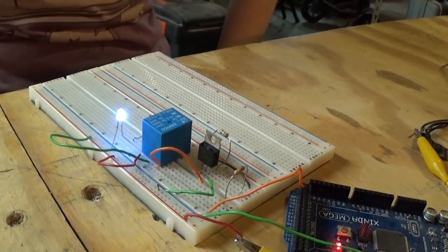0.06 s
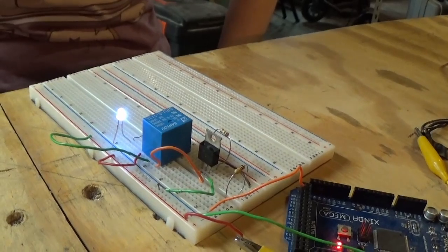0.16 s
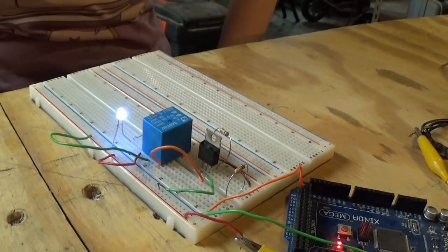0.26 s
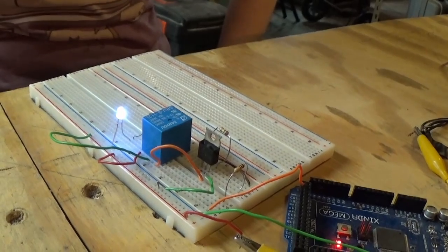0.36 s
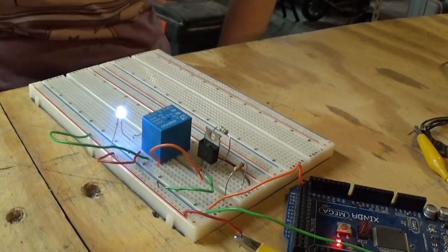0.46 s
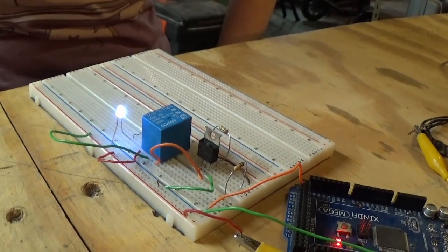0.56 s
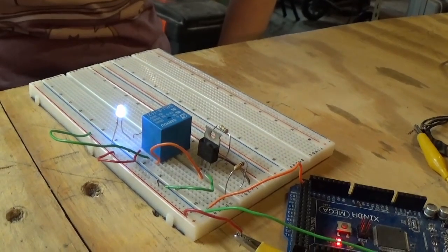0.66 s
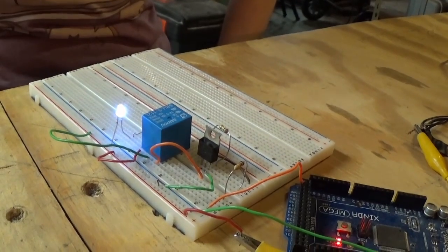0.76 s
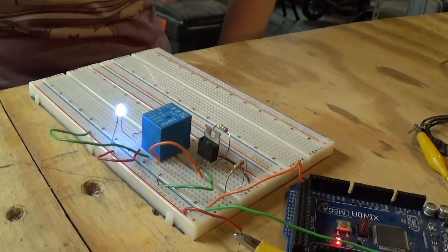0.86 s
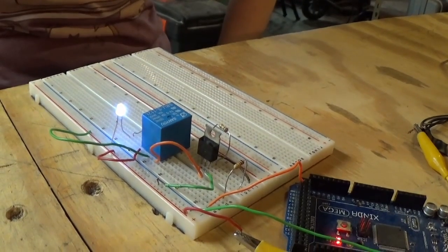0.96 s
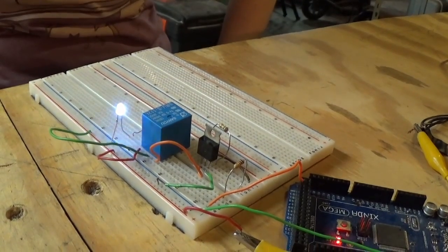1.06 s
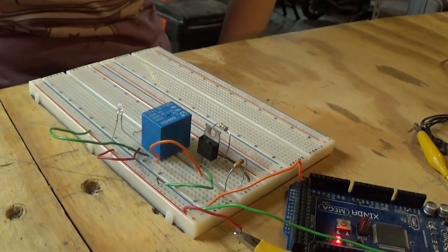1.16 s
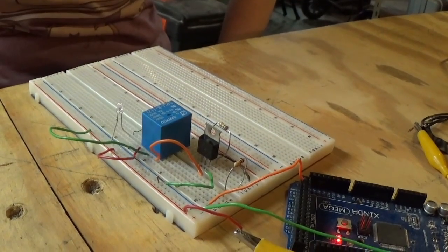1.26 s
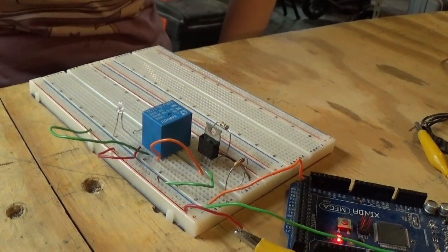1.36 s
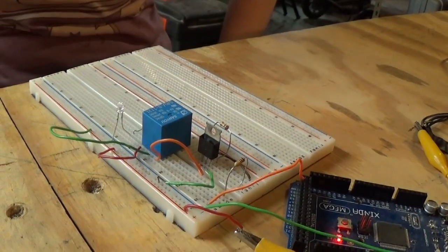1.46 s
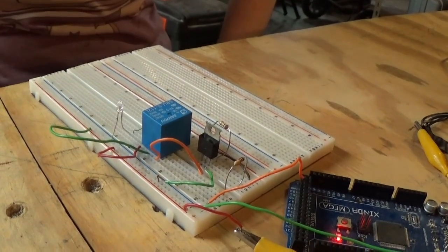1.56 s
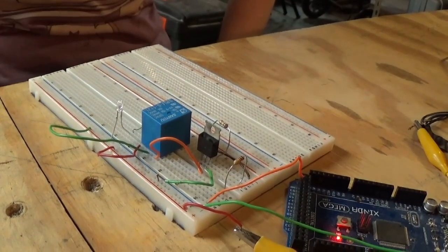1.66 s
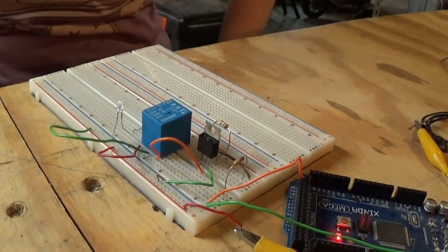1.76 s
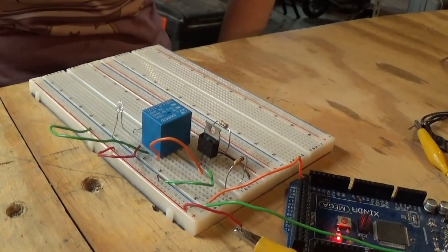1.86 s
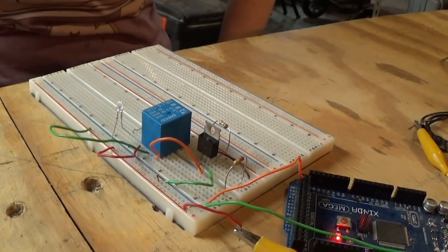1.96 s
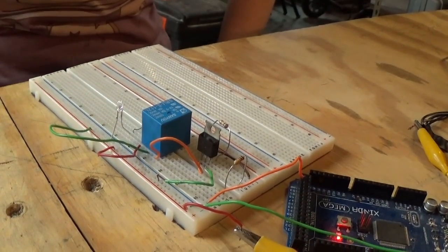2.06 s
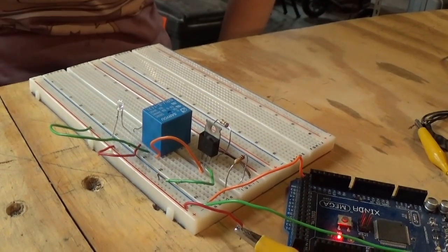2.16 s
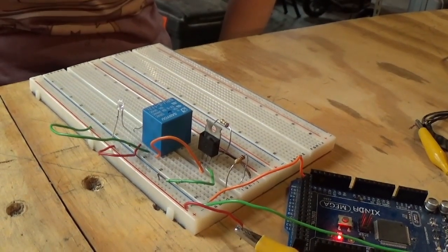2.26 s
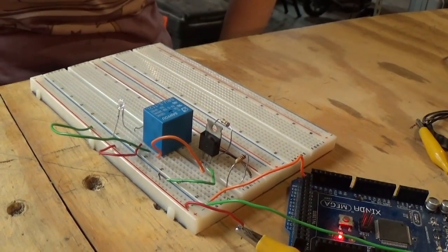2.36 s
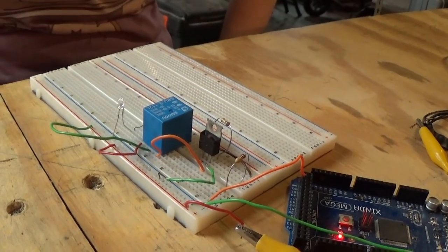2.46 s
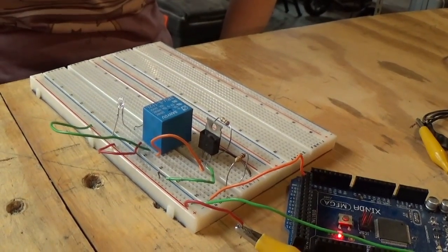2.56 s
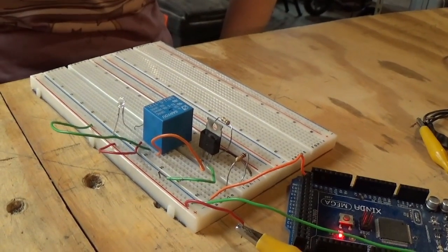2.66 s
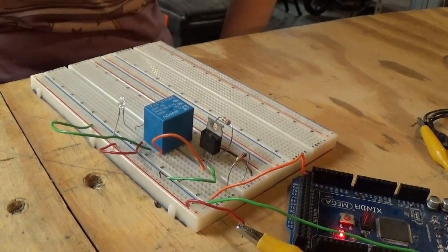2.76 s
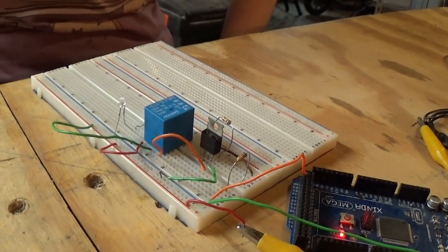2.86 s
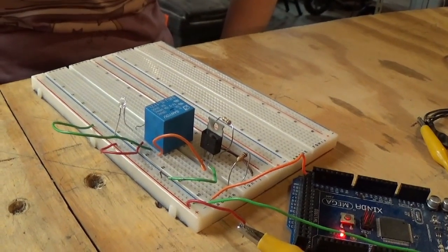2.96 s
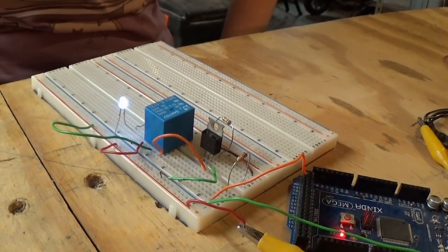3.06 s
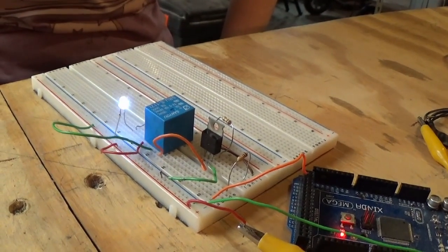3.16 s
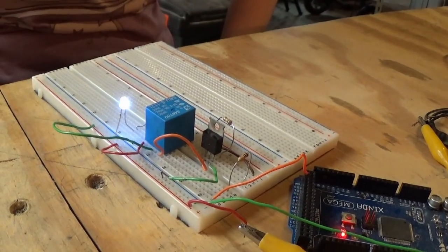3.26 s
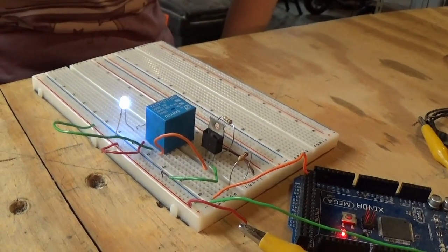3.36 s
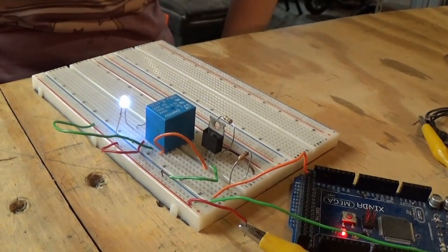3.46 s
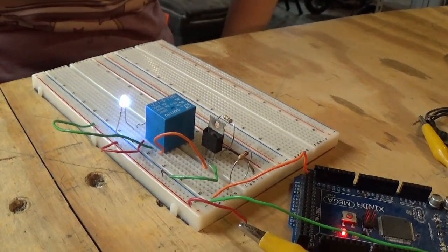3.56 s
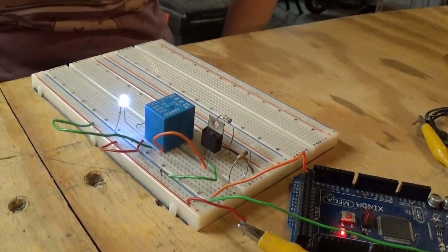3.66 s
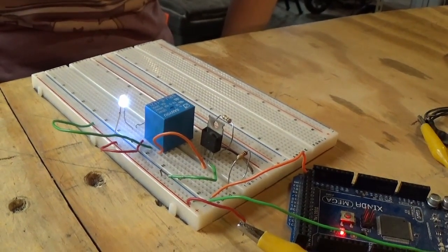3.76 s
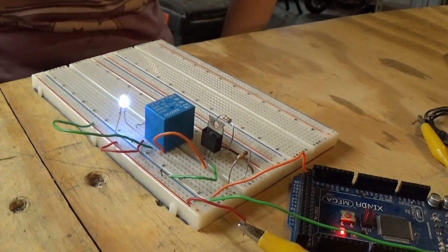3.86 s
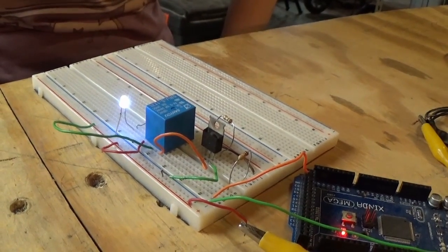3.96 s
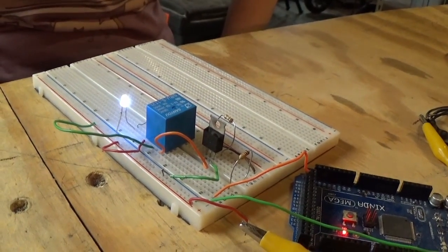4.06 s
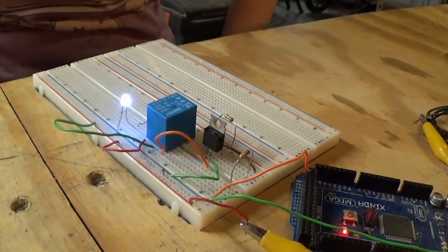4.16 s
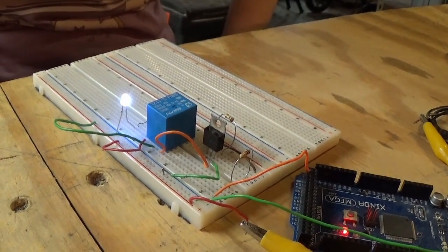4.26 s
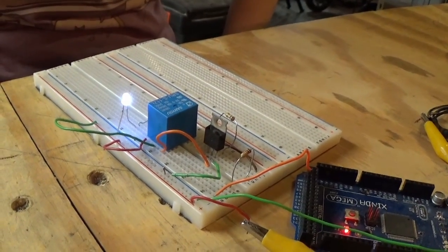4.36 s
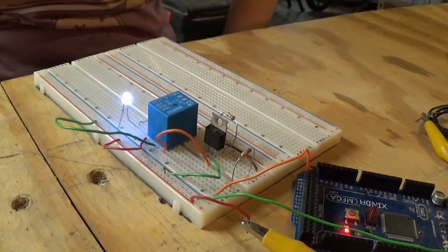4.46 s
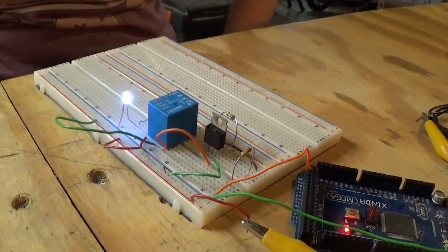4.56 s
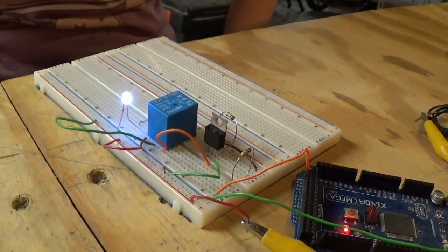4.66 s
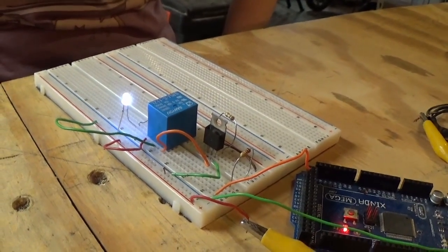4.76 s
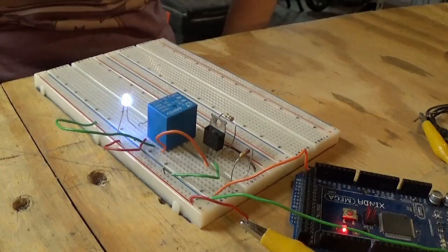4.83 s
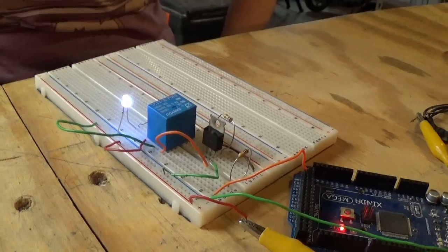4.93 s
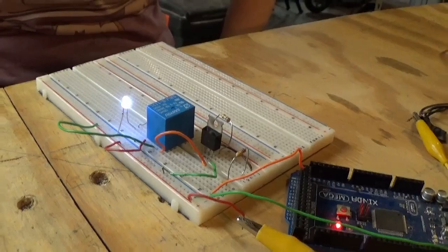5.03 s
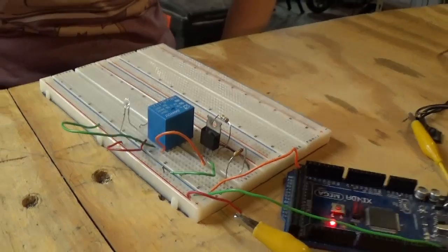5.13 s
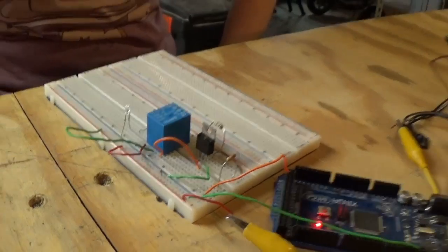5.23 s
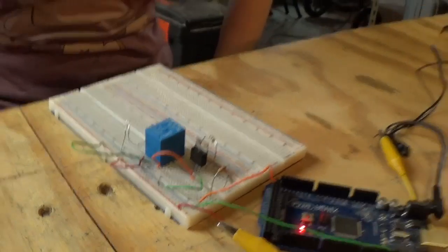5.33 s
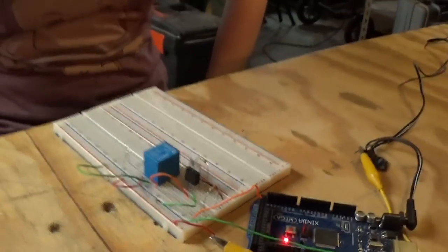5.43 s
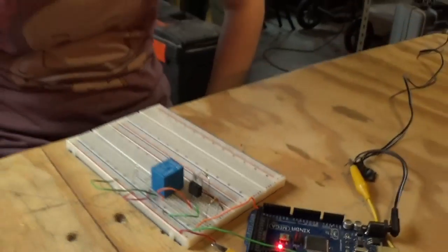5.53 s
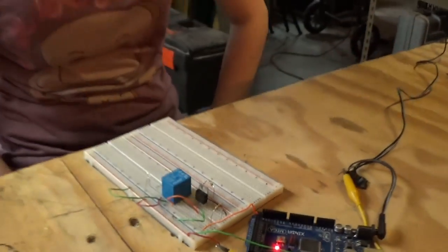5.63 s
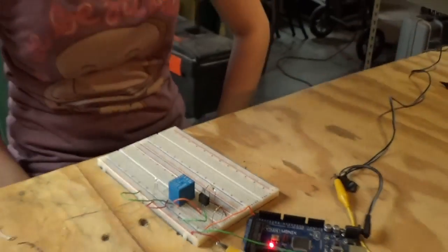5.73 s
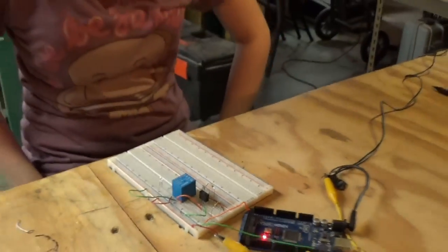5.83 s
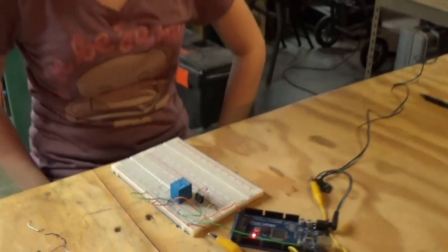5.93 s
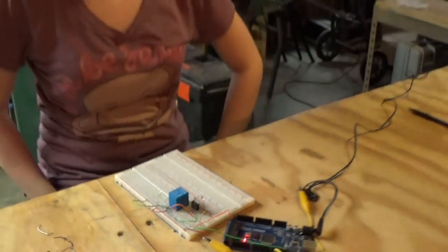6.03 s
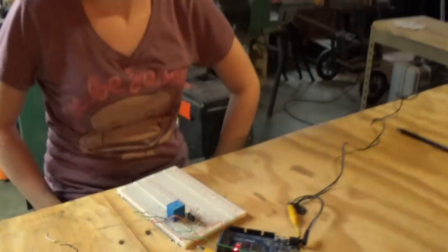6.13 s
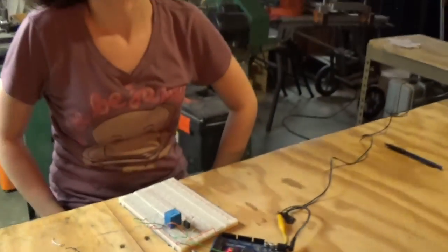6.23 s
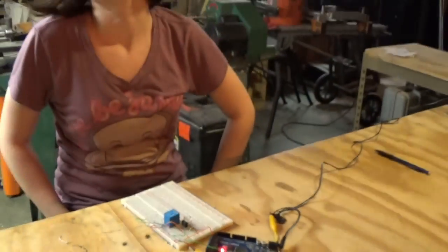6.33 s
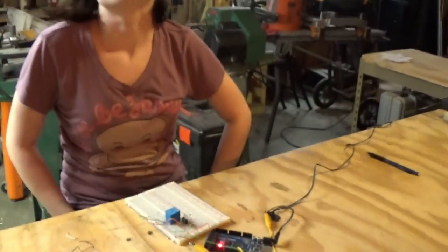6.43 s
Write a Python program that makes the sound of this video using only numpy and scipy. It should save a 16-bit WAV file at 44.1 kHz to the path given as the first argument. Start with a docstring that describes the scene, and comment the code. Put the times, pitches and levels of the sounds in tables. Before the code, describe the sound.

A quiet, medium-sized workshop, picked up by a close hand-held microphone: faint, steady ventilation rush with low, slightly wavering mains-like hum throughout. At about 1.1 s a small relay drops out with a very short, hard, bright click, its tiny bounces fused into one snap, followed by a brief, faint room echo. Around 1.7 s a soft dull bump on the bench, with barely audible plastic ticks at 1.8 and 2.3 s. At 3.1 s the relay pulls in, its click slightly more rattly, with a faint low thud. Small ticks come at 4.0 and 4.7 s. At 5.1 s the third sharp click sounds, surrounded by hollow plastic handling knocks from 5.0 to 5.15 s. Clothing swishes softly around 5.4 s, with light snaps at 5.5 to 5.6 s and a very faint rub. A tick at 6.1 s, then a gentle rustle and several small ticks near 6.4 s.

```python
"""Relay clicks in a quiet workshop

A small relay on a breadboard drops out, pulls in and drops out again, two seconds apart, near a hand-held camera.
Its armature strikes and bounces, exciting damped modes of frame, case and board; bench and room echo them.
Wavering hum lines and shaped ventilation noise lie underneath, with soft bumps of filtered noise.
Handling ticks ring a plastic shell, clothing rustles as modulated noise, and faint rubs excite narrow resonances."""
import sys
import numpy as np
from scipy import signal
from scipy.fft import rfft, irfft
from scipy.io import wavfile

SR = 44100
rng = np.random.default_rng(int(sys.argv[2]) if len(sys.argv) > 2 else 0)


def pcm_store(signal):
    """Save signal as 16-bit PCM."""
    levels = np.round(np.clip(np.atleast_2d(signal), -1, 1) * 32767)
    wavfile.write(sys.argv[1], SR, levels.astype(np.int16).T)


N = 286190  # length in samples

# Modes of board, case and frame. Each row: frequency in Hz, nominal t60 in seconds,
# then relative level in dB in the first, second and third switching.
RELAY_MODES = [(443.7, 0.0088, -44.5, -53.5, -55.5), (688, 0.029, -46, -41, -40),
               (1580, 0.031, -37.5, -36, -38), (2070, 0.029, -36.5, -48, -30.5),
               (2940, 0.022, -25, -49, -28), (3185, 0.02807, -27.5, -29, -26.5),
               (3620, 0.009, -14, -26.5, -15.5), (4217, 0.017, -14, -31, -18.5),
               (4540, 0.029, -27.5, -36.5, -26.5), (4720, 0.015, -28, -24, -23.5),
               (5390, 0.0224, -32, -29, -26.5), (5640, 0.012, -33.5, -30, -28.3),
               (6300, 0.031, -26, -46, -26.5), (6700, 0.013, -22.5, -42, -27.5),
               (7220, 0.02, -19, -35, -25), (7805, 0.013, -32, -31, -25), (8610, 0.008, -28, -19, -17.5),
               (9025, 0.015, -19.5, -21, -16.5), (9430, 0.029, -34, -23, -34.5),
               (9940, 0.0068, -13, -9.5, -38.5), (10470, 0.015, -15, -9, -13.9),
               (10900, 0.014, -15.5, -19, -15.5), (11460, 0.014, -23.5, -19, -15),
               (11520, 0.0079, -34, -20.5, -15), (12200, 0.024, -25.5, -30.5, -28.5),
               (12960, 0.0094, -34, -34, -31.8), (13300, 0.037, -44.5, -31, -50.5),
               (13969, 0.008, -27, -29.5, -31)]
# Colour of a snap. Each row: frequency in Hz, relative level in dB.
SNAP_COLOUR = [(300, -31), (2200, -15), (4000, 4), (9300, 2.5), (11500, -1), (15500, -24.5)]


def gain_of(db):
    """Amplitude ratio: 20 dB is a factor of ten."""
    return 10 ** (np.asarray(db) / 20)


def evened(x):
    """Normalization by the root mean square: scales to rms 1."""
    return x / np.sqrt(np.mean(x ** 2) + 1e-20)


def read(points, hz):
    """Linear interpolation of rows (Hz, value) on a log-frequency axis."""
    f, value = np.transpose(points)
    return np.interp(np.log(hz + 1), np.log(f + 1), value)


def dying(t, t60):
    """Exponential decay: the level falls 60 dB in t60 seconds."""
    return gain_of(-60 * t / t60)


def add(mix, s, sound):
    """Superposition: adds a sound to the mix from time s in seconds."""
    part = mix[round(s * SR):][:len(sound)]
    part += sound[:len(part)]


def noise(colour, size):
    """Spectral shaping: white noise weighted by rows (Hz, dB), then scaled to rms 1."""
    hz = np.fft.rfftfreq(size, 1 / SR)
    spectrum = rfft(rng.standard_normal(size)) * gain_of(read(colour, hz))
    return evened(irfft(spectrum, size))


def drift(rate):
    """Low-frequency random motion of rms 1: straight lines between random knots, rate of them a second."""
    knots = rng.standard_normal(SR)
    return evened(np.interp(np.arange(N) / SR * rate, np.arange(len(knots)), knots))


def ring(modes, size, start=0):
    """Modal superposition: damped sines for rows (Hz, dB, t60) from a start in seconds."""
    t = np.maximum(np.arange(size) / SR - start, 0)
    out = np.zeros(size)
    for k, (hz, db, t60) in enumerate(modes):
        sign = (-1) ** k  # neighbouring modes swing in opposite directions
        out += sign * gain_of(db) * dying(t, t60) * np.sin(2 * np.pi * hz * t)
    return out


def background(air_db=-62.5, flutter_db=0.5):
    """Narrow-band modulation widens hum and fan lines within the broadband rush of ventilation."""
    # Each row: frequency in Hz, level in dB rms, waver from 0 (steady) to 1 (wholly random).
    hum_lines = [(58.1, -70.5, 0.07), (115.8, -75.5, 0.2), (174.5, -77, .25), (235, -75, 0.4),
                 (293.4, -82, .6), (358.5, -78, 0.89), (388.4, -74, .45), (731, -80, 0.5)]
    # Ventilation colour. Each row: frequency in Hz, relative level in dB.
    air_colour = [(20, -28), (45, -24.5), (75, -20.5), (110, -9.5), (150, -4.5), (250, -1), (380, -2.5),
                  (650, 0), (1200, -3.5), (2500, -9), (5000, -13), (10000, -16.5), (14000, -20.5),
                  (16000, -22.5)]
    t = np.arange(N) / SR
    out = gain_of(air_db + flutter_db * drift(rate=6)) * noise(air_colour, size=N)
    for hz, db, waver in hum_lines:
        wander = (drift(rate=9) + 1j * drift(rate=9)) / np.sqrt(2)  # in amplitude and phase
        swing = 1 - waver + waver * wander
        carrier = np.exp(2j * np.pi * (hz * t + rng.random()))
        out += gain_of(db) * evened((swing * carrier).real)
    return out


def blows(count=4):
    """Inelastic rebound of the armature: later blows weaken; yields (s, dB, switching, room dB)."""
    # Drop-out, pull-in, drop-out. Each row: start in seconds, strength in dB, first flight in seconds,
    # each flight as a share of the last, loss per bounce in dB, level into the room in dB.
    switchings = [(1.10657, 0, 0.0015, 0.52, 12, -1.5), (3.09791, 0.2, .00228, .73, 4, 3),
                  (5.10066, 1, 0.000737, 0.58, 8.5, -1)]
    for switching, (s, db, flight, rebound, loss_db, room_db) in enumerate(switchings):
        for bounce in range(count):
            yield s, db - loss_db * bounce, switching, room_db
            s += flight * rebound ** bounce


def relay(damping=1.04):
    """Modal excitation: every blow rings the same modes, weighted anew in each switching."""
    out = np.zeros(N)
    hz, t60, *weights_db = np.transpose(RELAY_MODES)
    for s, db, switching, _ in blows():
        late = s - round(s * SR) / SR  # bounces fall between samples
        modes = zip(hz, weights_db[switching] + db, t60 / damping)
        add(out, s, ring(modes, size=4096, start=late))
    return out * np.sqrt(damping)  # keeps the energy despite the shorter decay


def radiated(blur_hz=170, skirts=1.7):
    """Radiated power: summed over all directions, the relay's peaks broaden and its notches fill."""
    out, size = np.zeros(N), 2048
    f = np.fft.rfftfreq(size, 1 / SR)[:, None]
    hz, t60, *weights_db = np.transpose(RELAY_MODES)
    humps = (1 + ((f - hz) / blur_hz) ** 2) ** -skirts
    humps /= humps.mean(0)
    for s, db, switching, room_db in blows():
        amplitude = gain_of(weights_db[switching] + db + room_db)
        energy = amplitude ** 2 * t60 * SR / (4 * np.log(1000))  # of each damped sine
        pulse = np.fft.fftshift(irfft(np.sqrt(humps @ energy)))
        add(out, s - size / 2 / SR, pulse)  # centred on the blow
    return out


def bench(x, scatter_db=-19, scatter_t60=0.07, delay=0.004, dull_hz=7000):
    """Early scattering: the bench top and things on it return a dense, slightly dulled burst of echoes."""
    t = np.arange(4096) / SR
    taps = rng.standard_normal(len(t)) * dying(t, scatter_t60) * (t > delay)
    taps /= np.linalg.norm(taps)
    taps = signal.lfilter(*signal.butter(1, dull_hz, fs=SR), taps)
    return gain_of(scatter_db) * signal.oaconvolve(x, taps)[:N]


def workshop(x, onset=0.0083):
    """Diffuse reverberation: dense wall echoes, each band dying at its own speed."""
    # Each row: frequency in Hz, relative level in dB, t60 in seconds.
    bands = np.array([(303, -10, .35), (1493, -14.5, 0.29), (2700, -14, 0.32), (3700, -14.5, 0.33),
                      (5200, -14, 0.35), (7300, -15, .32), (9030, -22, 0.293), (10420, -28.5, 0.32),
                      (11800, -26, .26), (13000, -24, .24), (16080, -28, .2)])
    swell = np.minimum(np.arange(SR) / SR / onset, 1) ** 2
    hz, t, z = signal.stft(rng.standard_normal(SR), SR, nperseg=256)
    level_db = read(bands[:, :2], hz)[:, None]
    t60 = read(bands[:, ::2], hz)[:, None]
    unit_energy = np.sqrt(2 * np.log(1000) / (t60 * SR))
    z = z * gain_of(level_db) * unit_energy * dying(t, t60)
    tail = signal.istft(z, SR, nperseg=256)[1][:SR] * swell
    return signal.oaconvolve(x, tail)[:N]


def bumps():
    """Transient broadband excitation: dull pushes on the wooden bench swell and die away."""
    # Each row: start in seconds, level in dB before the envelope, rise in seconds, t60 in seconds,
    # pitch as a factor on the colour's frequencies.
    pushes = [(1.662, -47.5, 0.064, 0.53, 1.03), (3.1, -50, .002, 0.24, 1.45),
              (5.072, -50, 0.0037, 0.092, 1.2)]
    # Each row: frequency in Hz before the pitch factor, relative level in dB.
    push_colour = [(50, -39.5), (100, -15), (180, -7), (320, 4), (430, -3.5), (650, -15.5), (1200, -28),
                   (4000, -60.5)]
    out, t = np.zeros(N), np.arange(SR) / SR
    for s, db, rise, t60, pitch in pushes:
        colour = [(hz * pitch, level) for hz, level in push_colour]
        envelope = np.minimum(t / rise, 1) * dying(t, t60)
        add(out, s, gain_of(db) * noise(colour, size=SR) * envelope)
    return out


def ticks(snap_t60=0.0082, scrape_db=-20, scrape_t60=0.018):
    """Impulsive excitation: plastic shifts in the hand, a bright snap and a slip that knocks the hollow shell."""
    # Each row: start in seconds, hollow knock in dB, bright snap in dB, pitch as a factor on the shell.
    shifts = [(1.777, -56.5, -66, 1.25), (2.334, -55.5, -53, 1.36), (4.0335, -54.5, -67, 1.43),
              (4.7265, -50, -53, 1.2), (4.7375, -39.5, -47.5, 0.96), (5.0193, -47.5, -39, 0.98),
              (5.1105, -42.5, -42, 0.457), (5.152, -38.5, -38.5, 0.98), (5.4985, -64, -43.5, 2.2),
              (5.5266, -63, -50.5, 2), (5.6067, -50.5, -60, 0.495), (6.0974, -51.5, -50.5, 0.94),
              (6.3577, -50.5, -55, 0.7), (6.366, -50, -46, 1.1), (6.387, -49, -51, 1.37)]
    # Each row: frequency in Hz before the pitch factor, relative level in dB, t60 in seconds.
    shell_modes = [(1138, -2.5, 0.015), (1548, -2.5, 0.01), (1948, 2.5, 0.025), (2270, -5.5, 0.023),
                   (2716, -4, 0.02), (3340, -6.5, 0.018)]
    out, t = np.zeros(N), np.arange(4096) / SR
    for s, knock_db, snap_db, pitch in shifts:
        shell = ring([(hz * pitch, db, t60) for hz, db, t60 in shell_modes], size=len(t))
        scrape = gain_of(scrape_db) * rng.standard_normal(len(t)) * dying(t, scrape_t60)
        slip = (t == 0) + scrape  # an impulse, then friction
        knock = signal.fftconvolve(slip / np.linalg.norm(slip), shell)[:len(t)]
        snap = noise(SNAP_COLOUR, size=len(t)) * dying(t, snap_t60)
        add(out, s, gain_of(knock_db) * knock + gain_of(snap_db) * snap)
    return out


def swing_db(s, rise, release, fade_db=20.5):
    """Speed-dependent friction: the level climbs to s and falls after it, by fade_db over rise or release."""
    t = np.arange(N) / SR
    return -fade_db * np.maximum((s - t) / rise, (t - s) / release)


def rubs(width_hz=106):
    """Friction-driven resonance: steady rubbing keeps one narrow resonance sounding through a stroke."""
    # Each row: fastest point in seconds, rise in seconds, release in seconds, level in dB, resonance in Hz.
    rubbings = [(5.29, .15, .25, -64, 1840), (6.27, 0.41, 0.33, -73, 3230)]
    out = np.zeros(N)
    for s, rise, release, db, hz in rubbings:
        resonance = signal.iirpeak(hz, hz / width_hz, fs=SR)
        tone = signal.lfilter(*resonance, rng.standard_normal(N))
        out += gain_of(db + swing_db(s, rise, release)) * evened(tone)
    return out


def strokes(scuff_spread=1.8):
    """Incoherent addition: levels of hiss and scuff, overlapping strokes summed in power."""
    # Each row: fastest point in seconds, rise of the hiss in seconds, release of the hiss in seconds,
    # hiss in dB, scuff in dB.
    cloth_strokes = [(5.39, 0.12, 0.16, -52, -60), (5.96, .09, 0.13, -66.5, -79),
                     (6.31, .8, 0.44, -64.5, -66), (6.38, 0.059, 0.078, -59.5, -56.5)]
    hiss, scuff = 0, 0
    for s, rise, release, hiss_db, scuff_db in cloth_strokes:
        swing = swing_db(s, rise, release)
        hiss += gain_of(hiss_db + swing) ** 2
        scuff += gain_of(scuff_db + swing / scuff_spread) ** 2  # folds scuff longer than fibres hiss
    return np.sqrt(hiss), np.sqrt(scuff)


def crackle(per_s=35, snap_t60=0.008):
    """Shot noise: tiny snaps at random moments, together of rms 1."""
    t = np.arange(1024) / SR
    catches = (rng.random(N) < per_s / SR) * rng.uniform(-0.99, 1, N)
    snap = noise(SNAP_COLOUR, size=len(t)) * dying(t, snap_t60)
    return evened(signal.oaconvolve(catches, snap)[:N])


def clothing(grain_db=1.0, clump_db=1.2, snag_db=2.0, crackle_db=-11):
    """Stick-slip friction: fibres catch and slip in tiny clumps while folds snag, crackle and scuff."""
    # Colour of sliding fibres. Each row: frequency in Hz, relative level in dB.
    fibre_colour = [(150, -13.5), (480, 8.5), (900, -3.5), (2000, -18), (4000, -1), (6500, -1), (9500, 3),
                    (11500, -5), (13500, -15), (16000, -26)]
    # Duller scuff of folds. Each row: frequency in Hz, relative level in dB.
    fold_colour = [(150, -17.5), (450, -14), (1100, 2), (1500, -3), (1900, -1), (2600, -0.5), (3300, -3),
                   (4500, -11.5), (8000, -19), (16000, -31)]
    hiss, scuff = strokes()
    grain = evened(gain_of(grain_db * drift(rate=1400) + clump_db * drift(rate=70)))
    snags = evened(gain_of(snag_db * drift(rate=200)))
    folds = snags * noise(fold_colour, size=N) + gain_of(crackle_db) * crackle()
    return grain * (hiss * noise(fibre_colour, size=N) + scuff * folds)


def scene():
    """Linear superposition: direct sounds, their echoes and the quiet workshop add up."""
    handling = ticks()
    spread = radiated() + handling
    direct = relay() + handling
    echoes = bench(spread) + workshop(spread)
    return (direct + echoes + bumps() + clothing() + background() + rubs())[None]


def record(dry, low_cut_hz=38, edge_hz=15900):
    """Linear filtering: the microphone's low cut and the recorder's band limit."""
    low_cut = signal.butter(4, low_cut_hz, "high", fs=SR, output="sos")
    thinned = signal.sosfilt(low_cut, dry)
    band_limit = signal.firwin(511, edge_hz, window=("kaiser", 9), fs=SR)
    return signal.oaconvolve(thinned, band_limit[None], "same")


dry = scene()
out = record(dry)
pcm_store(out)
```